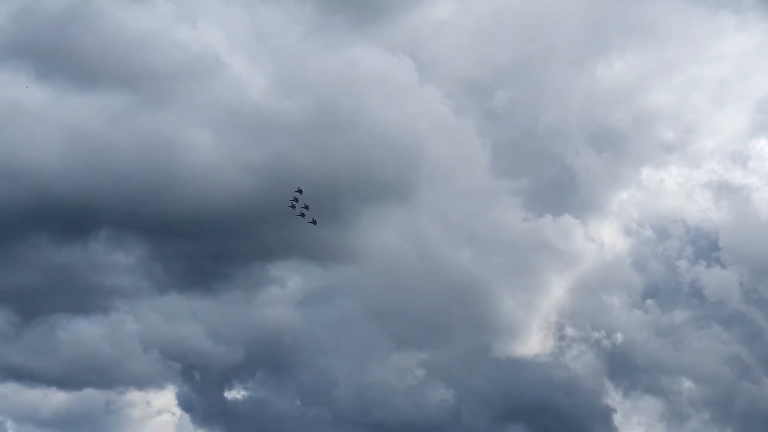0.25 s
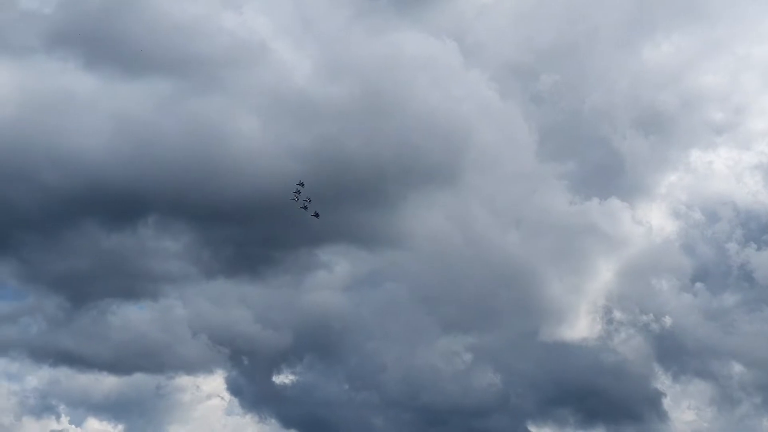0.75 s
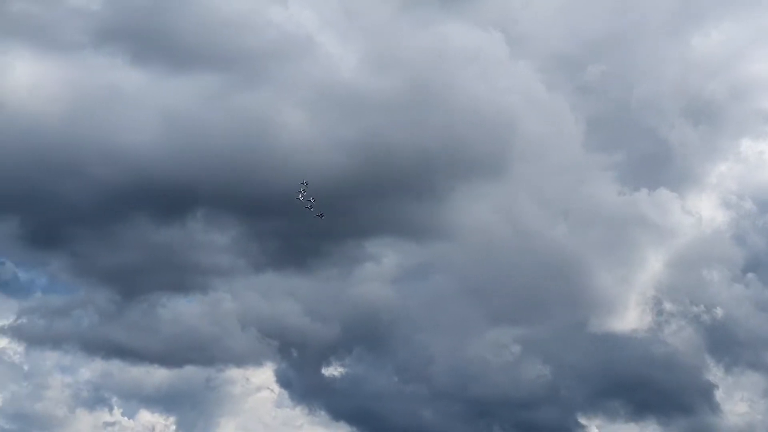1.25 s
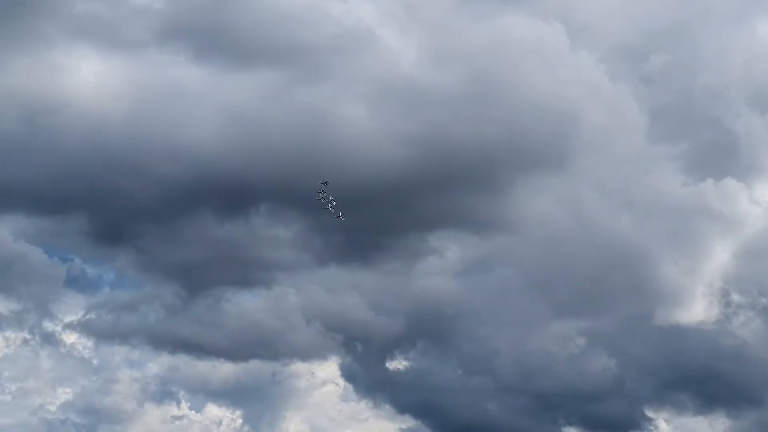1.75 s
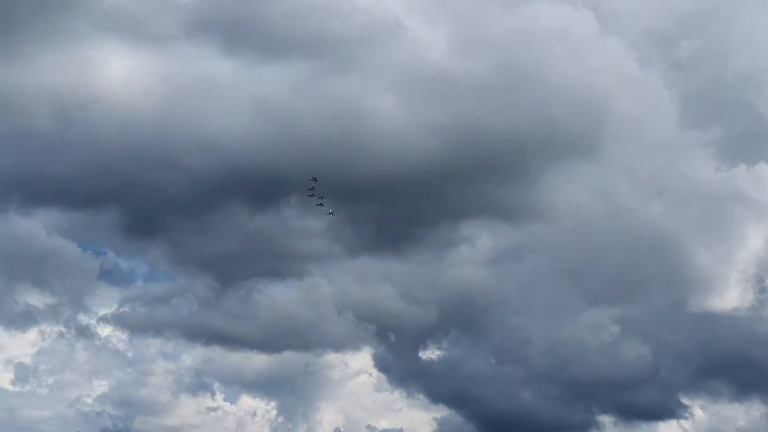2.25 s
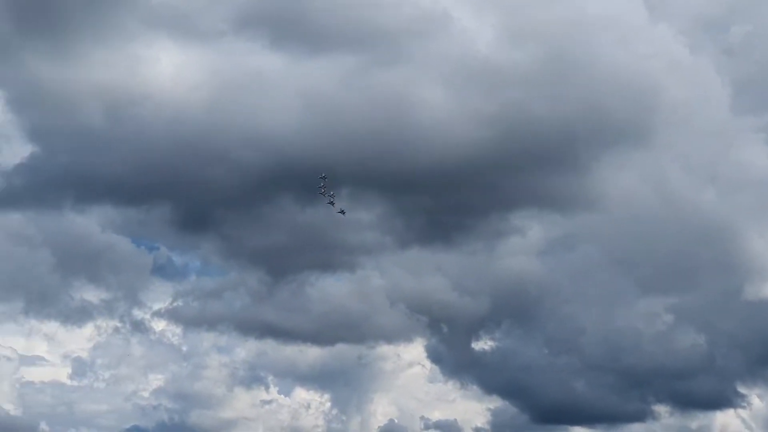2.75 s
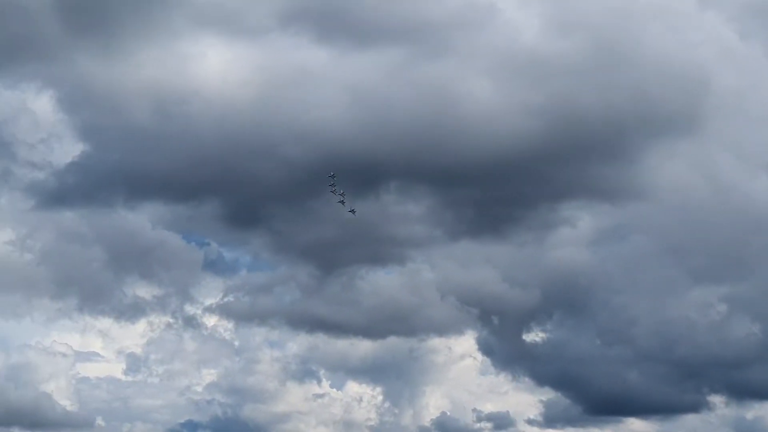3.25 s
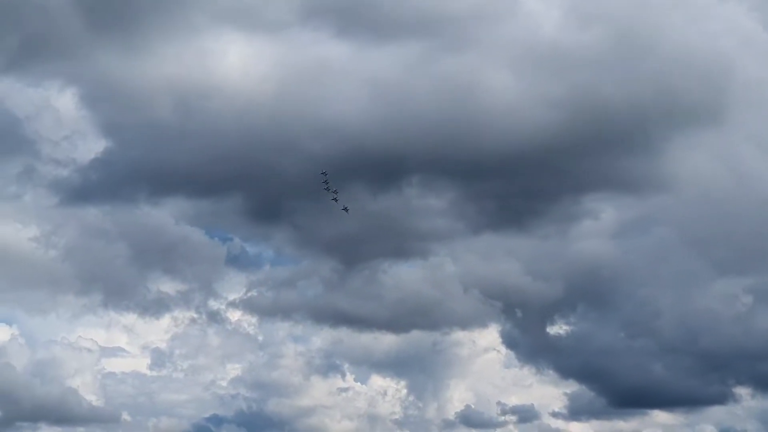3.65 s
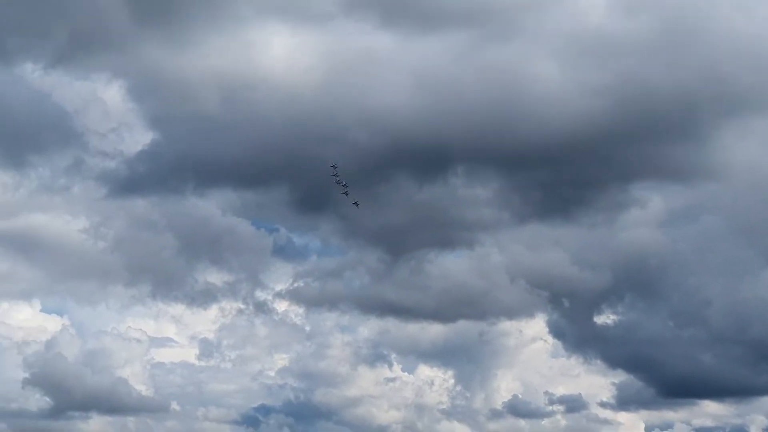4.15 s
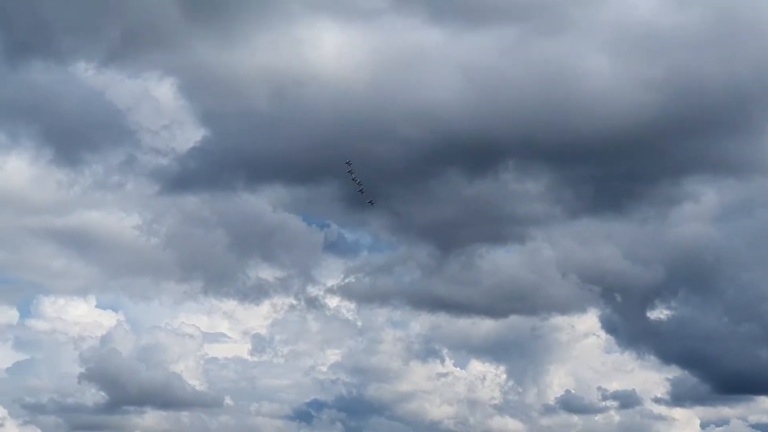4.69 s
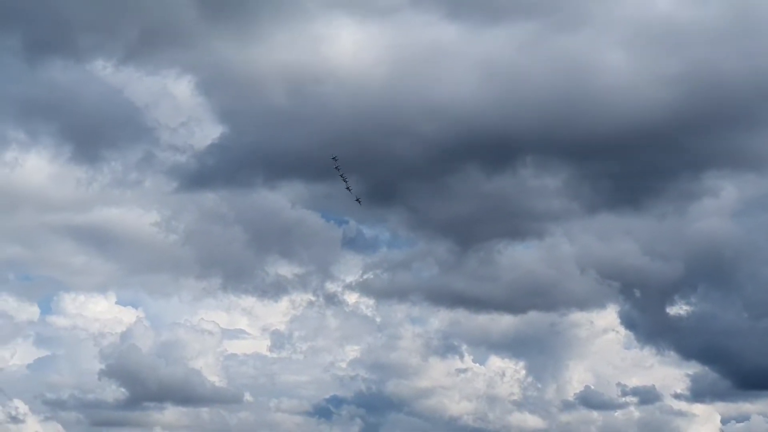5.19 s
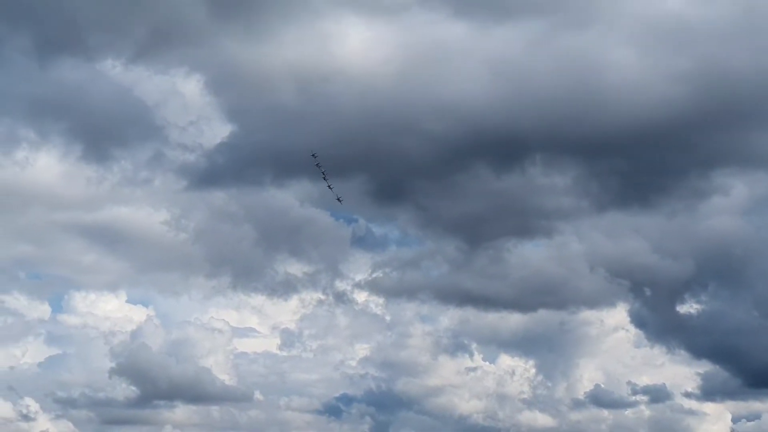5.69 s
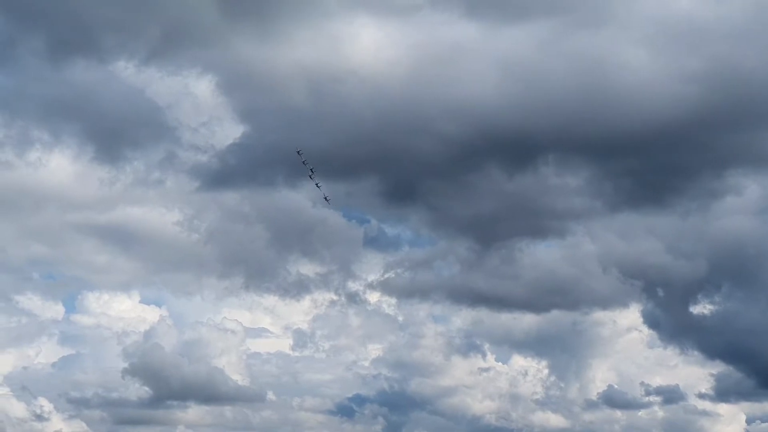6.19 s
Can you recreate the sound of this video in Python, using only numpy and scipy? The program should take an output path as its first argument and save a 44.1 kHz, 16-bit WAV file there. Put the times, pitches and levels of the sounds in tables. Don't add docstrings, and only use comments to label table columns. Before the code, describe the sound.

Heavy, muffled exhaust roar of several receding fighter jets, surging and dropping in the moving air, with low wind rumble on a hand-held camera microphone.

```python
import sys
import numpy as np
from scipy import signal
from scipy.io import wavfile
from scipy.ndimage import uniform_filter1d, minimum_filter1d

SR = 44100
rng = np.random.default_rng(int(sys.argv[2]) if len(sys.argv) > 2 else 0)


def put_to_file(sound):
    columns = np.atleast_2d(sound).T
    safe = np.clip(columns, -1, 1)
    whole_steps = np.round(safe * 32767)
    wavfile.write(sys.argv[1], SR, whole_steps.astype(np.int16))


def amplitude_ratio(level_db):
    exponent = np.asarray(level_db, float) / 20
    return 10 ** exponent


N = 283563

# t/s, swell level/dB, brightness level/dB
AIR = [(0, -16.5, -0.5), (.3, -13, 0), (.6, -10, -1), (1.02, -11, -3), (1.1, -18.5, -3.5),
       (2.25, -19.5, -4), (2.35, -21, -4.5), (2.85, -22, -2), (3.05, -17.5, -3), (3.98, -19, -0.5),
       (4.22, -11.5, 3), (4.68, -12, 2), (4.85, -18, -1.5), (5.35, -18.5, -2), (5.5, -12.5, -0.5),
       (5.76, -12, -1), (5.94, -19.5, 2), (6.43, -16, 4)]
# f/Hz, share/1
SWELL_SHARE = [(150, 1.2), (330, 1.11), (500, 0.95), (720, 0.73), (1600, 0.55), (2500, 0.47), (4000, 0.37)]
# f/Hz, share/1
BRIGHT_SHARE = [(330, -.4), (500, .3), (720, 1.1), (1600, .8)]
# t/s, half length/s, centre f/Hz, level/dB
EDDIES = [(0.201, .15, 800, -5), (0.382, 0.037, 441, 3.5), (0.598, .1, 191, 0.5), (0.858, 0.1, 2000, 6.5),
          (0.591, .05, 500, 3), (.72, 0.021, 403, -4), (0.805, 0.044, 292, 3.5), (0.891, 0.068, 570, 6.5),
          (1.96, 0.03, 323, 2), (3.111, .04, 316, 3.5), (3.503, .06, 400, 1), (3.67, 0.028, 321, -8),
          (4.281, 0.019, 318.4, 3.5), (4.425, .06, 725, 4.5), (4.608, .03, 351, 6.5),
          (5.151, 0.045, 336, 3), (5.458, 0.021, 330.5, 2), (5.545, .04, 505, 2.5),
          (5.631, 0.029, 341, -4.5), (5.7, .04, 380, 5), (5.725, 0.12, 182, -5), (6.253, .12, 746, 2.5)]
# t/s, delay/ms, strength/1
GROUND_BOUNCE = [(0, 3.1, .3), (.3, 3.2, .6), (1.0, 3.25, .6), (1.2, 3.15, .3), (2.4, 2.95, .3),
                 (3.2, 2.9, .4), (4.0, 2.9, .35), (4.15, 2.95, .6), (4.7, 2.92, .6), (5.1, 2.8, .35),
                 (5.6, 2.75, .45), (6.43, 2.7, .55)]
# f/Hz, level/dB
ROAR_SPECTRUM = [(100, -28.5), (160, -7.5), (310, -3), (410, -4.5), (500, -7), (640, -8), (750, -6.5),
                 (900, -10), (1460, -11), (1670, -19.5), (2000, -16), (2500, -31.5), (3100, -45.5),
                 (4000, -53)]
# f/Hz, likeness/1; f/Hz, left lead/rad; f/Hz, left minus right level/dB
ROAR_PORTS = [
    [(120, .97), (320, .98), (500, .9), (700, .94), (1300, .95), (1670, .75), (2000, .7), (2450, .45), (3000, .7)],
    [(120, -.1), (320, -.3), (500, -.5), (700, -.95), (970, -1.5), (1300, -1.55), (1670, -2.5), (2000, -2.2), (3000, -2.0)],
    [(120, 0), (320, .3), (500, 1.5), (700, 0), (1300, .7), (1670, -2.5), (2000, -3), (2450, .5), (3000, 4.5)],
]
# f/Hz, level/dB
RUMBLE_SPECTRUM = [(15, -32), (25, 0.5), (40, -14), (62, -0.5), (100, 2), (130, -1.5), (170, -3),
                   (240, -20), (400, -93)]
# t/s, level/dB
HISS_LEVEL = [(0, -59), (.2, -63.5), (.8, -61.5), (1.1, -70.5), (1.6, -69.5), (2.0, -59.5), (2.5, -61.5),
              (2.8, -65.5), (3.2, -64.5), (3.6, -57.5), (3.9, -59.5), (4.3, -65.5), (4.8, -64.5),
              (5.3, -64.5), (5.8, -64.5), (6.43, -67)]
# f/Hz, level/dB
HISS_SPECTRUM = [(2200, -11), (3000, 4), (3700, -7.5), (4300, 2), (5200, -8.5), (6100, -3.5), (6900, -11.5),
                 (7400, -7.5), (7900, -21.5), (8800, -18), (9400, -39.5), (15000, -44)]
# f/Hz, likeness/1; f/Hz, left lead/rad; f/Hz, left minus right level/dB
HISS_PORTS = [
    [(3000, 0.33), (4300, 0.47), (5200, .3), (6000, 0.48), (7300, 0.37), (9000, 0.34)],
    [(3000, -0.5), (4300, -1.5), (5300, -9), (6000, 14), (7200, 2.5), (9000, -1)],
    [(3000, -0.5), (4300, 5), (5200, 10.5), (6000, 4.5), (7200, -7), (8500, 7.5)],
]
# t/s, level/dB
WHINE_LEVEL = [(0, -81), (1, -83), (2.5, -79), (3.6, -80), (4.6, -83), (6.43, -81)]
# t/s, peak level/dB, f/Hz, pan/dB (twice left minus right level)
TICKS = [(1.1273, -73, 12800, 0), (3.118, -83, 12500, -5), (3.1986, -58.5, 12000, -15),
         (3.6376, -63, 11100, 7.5), (4.1515, -57.5, 11500, -9), (4.6568, -66.5, 9340, 0),
         (4.9234, -63.5, 10900, 12.5), (5.2016, -66, 11400, -4), (5.317, -63, 12300, -2),
         (5.6053, -58.5, 9540, 9.5), (5.7953, -66.5, 9570, 15)]


def read(points, f_hz):
    table_hz, value = np.transpose(points)
    return np.interp(np.log(f_hz + 1), np.log(table_hz + 1), value)


def columns(rows, t_s):
    row_s, *values = np.transpose(rows)
    return [np.interp(t_s, row_s, value) for value in values]


def unit_rms(x):
    return x / np.sqrt(np.mean(x ** 2) + 1e-20)


def stft_axes(size):
    hop = size // 4
    t_s = np.arange(N // hop + 5) * hop / SR
    f_hz = np.fft.rfftfreq(size, 1 / SR)[:, None]
    return t_s, f_hz


def patches(t_s, f_hz, bins, frames):
    field = rng.standard_normal((len(t_s), len(f_hz))).T
    field = uniform_filter1d(field, bins, axis=0)
    return unit_rms(uniform_filter1d(field, frames, axis=1))


def port_noise(magnitude, likeness, lead_rad=0, balance_db=0):
    size = 2 * len(magnitude) - 2
    a, b, c, d = rng.standard_normal(magnitude.T.shape + (4,)).T
    likeness = np.clip(likeness, 0, 1)
    left = a + 1j * b
    right = likeness * left + np.sqrt(1 - likeness ** 2) * (c + 1j * d)
    left_port = left * np.exp(1j * lead_rad) * amplitude_ratio(balance_db / 2)
    right_port = right * amplitude_ratio(-balance_db / 2)
    spectra = np.array([left_port, right_port]) * magnitude
    _, x = signal.istft(spectra, nperseg=size, noverlap=size - size // 4)
    return unit_rms(x[:, :N])


def air_gain_db(t_s, f_hz):
    swell_db, bright_db = columns(AIR, t_s)
    gain_db = read(SWELL_SHARE, f_hz) * (swell_db - swell_db.mean())
    gain_db = gain_db + read(BRIGHT_SHARE, f_hz) * bright_db
    width_oct = 0.7
    for eddy_s, half_s, centre_hz, eddy_db in EDDIES:
        off_t = (t_s - eddy_s) / half_s
        off_f = np.log2((f_hz + 1) / centre_hz) / width_oct
        gain_db = gain_db + eddy_db * np.exp(-off_t ** 2 - off_f ** 2)
    return gain_db


def ground_comb(t_s, f_hz):
    delay_ms, strength = columns(GROUND_BOUNCE, t_s)
    bounce = np.clip(strength, 0, 0.95) * np.exp(-f_hz / 3500)
    echo = bounce * np.exp(-2j * np.pi * f_hz * delay_ms / 1000)
    return abs(1 + echo) / np.sqrt(1 + bounce ** 2)


def roar():
    t_s, f_hz = stft_axes(size=1024)
    air_db = air_gain_db(t_s, f_hz)
    comb = ground_comb(t_s, f_hz)
    dapple_db = 1.4 * patches(t_s, f_hz, bins=6, frames=24)
    dapple_db = dapple_db + 0.67 * patches(t_s, f_hz[:1], bins=1, frames=8)
    absorbed_db = -np.maximum(f_hz - 4000, 0) / 40
    level_db = read(ROAR_SPECTRUM, f_hz) + absorbed_db + air_db + dapple_db
    likeness, lead_rad, balance_db = [read(table, f_hz) for table in ROAR_PORTS]
    return amplitude_ratio(-12.0) * port_noise(amplitude_ratio(level_db) * comb, likeness, lead_rad, balance_db)


def rumble():
    t_s, f_hz = stft_axes(size=2048)
    swell_share, growth_db_per_s, mean_likeness = 0.4, 0.9, 0.83
    swell_db, _ = columns(AIR, t_s)
    gust = patches(t_s, f_hz[:1], bins=1, frames=10)
    lumps_db = 0.23 * patches(t_s, f_hz, bins=3, frames=10) + 2.4 * gust
    level_db = read(RUMBLE_SPECTRUM, f_hz) + swell_share * swell_db + growth_db_per_s * t_s + lumps_db
    likeness = mean_likeness - 0.12 * gust
    return amplitude_ratio(-23.5) * port_noise(amplitude_ratio(level_db), likeness, lead_rad=-f_hz / 1300)


def hiss():
    t_s, f_hz = stft_axes(size=512)
    gusts_db = 0.79 * patches(t_s, f_hz, bins=12, frames=20)
    gusts_db = gusts_db + 0.6 * patches(t_s, f_hz[:1], bins=1, frames=12)
    level_db = read(HISS_SPECTRUM, f_hz) + columns(HISS_LEVEL, t_s)[0] + gusts_db
    likeness, lead_rad, balance_db = [read(table, f_hz) for table in HISS_PORTS]
    return amplitude_ratio(-58.0) * port_noise(amplitude_ratio(level_db), likeness, lead_rad, balance_db)


def whine():
    carrier_hz, fuzz_hz = 9109, 45
    t_s = np.arange(N) / SR
    pole = np.exp(-np.pi * fuzz_hz / SR)
    noise = rng.standard_normal(N) + 1j * rng.standard_normal(N)
    fuzz = signal.lfilter([1], [1, -2 * pole, pole ** 2], noise)
    beats = fuzz / abs(fuzz).mean() + 0.6
    tone = unit_rms((beats * np.exp(2j * np.pi * carrier_hz * t_s)).real)
    port_gain = amplitude_ratio(np.array([[10.0], [3.0]])) * [[1], [-1]]
    return tone * amplitude_ratio(columns(WHINE_LEVEL, t_s)[0]) * port_gain


def ticks():
    out = np.zeros((2, N))
    t_s = np.arange(3000) / SR
    decay_db = -60 * t_s / 0.06
    attack = np.minimum(t_s / 0.002, 1)
    heights = np.array([1, 0.7, 0.7, 0.7, 0.7])[:, None]
    chances = rng.random((len(TICKS), 4))
    for (tick_s, peak_db, mode_hz, pan_db), chance in zip(TICKS, chances):
        modes_hz = mode_hz * np.append(1, 0.75 + 0.7 * chance)[:, None]
        ring = (heights * np.sin(2 * np.pi * modes_hz * t_s)).sum(0)
        ring = ring * amplitude_ratio(peak_db + decay_db) * attack
        start = round(tick_s * SR)
        part = out[:, start:start + len(t_s)]
        part += amplitude_ratio(np.array([[pan_db], [-pan_db]]) / 4) * ring[:part.shape[1]]
    return out


def scene():
    return roar() + rumble() + hiss() + whine() + ticks()


def top_cut(x):
    return signal.sosfilt(signal.butter(12, 14600, fs=SR, output="sos"), x)


def record(dry):
    room = np.minimum(0.989 / (abs(dry).max(0) + 1e-9), 1)
    gain = uniform_filter1d(minimum_filter1d(room, size=600), size=600)
    gain *= signal.windows.tukey(N, 120 / N)
    return top_cut(dry * gain)


dry = scene()
out = record(dry)
put_to_file(out)
```